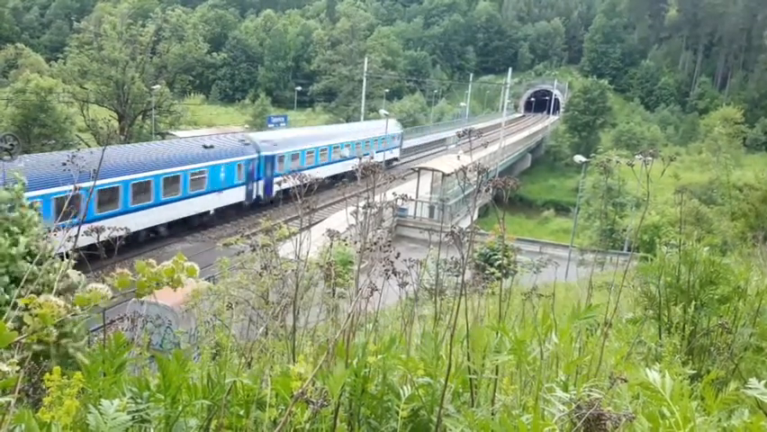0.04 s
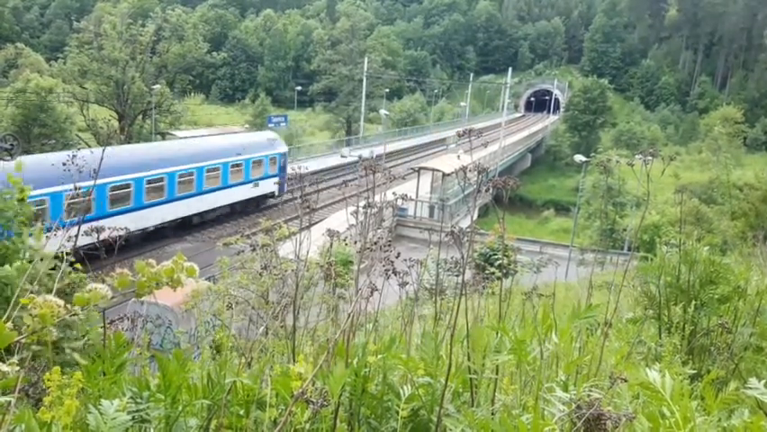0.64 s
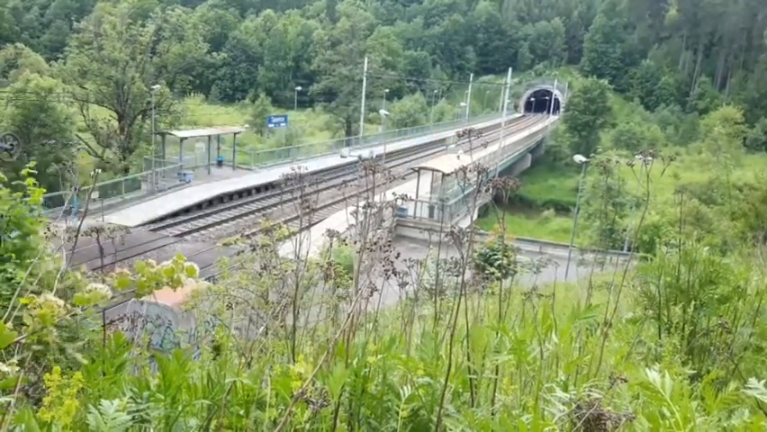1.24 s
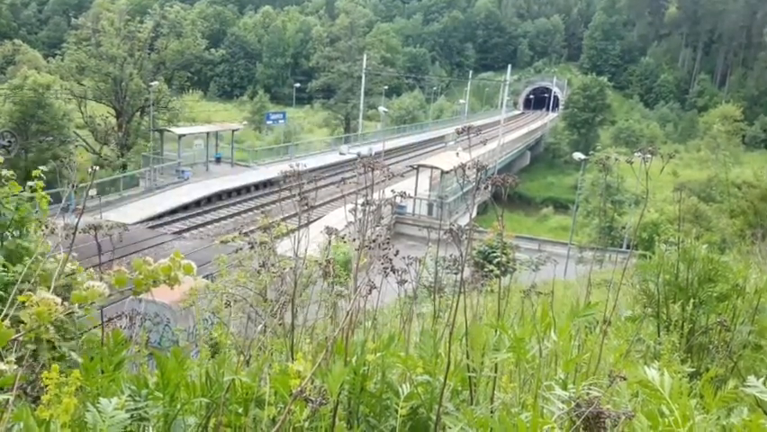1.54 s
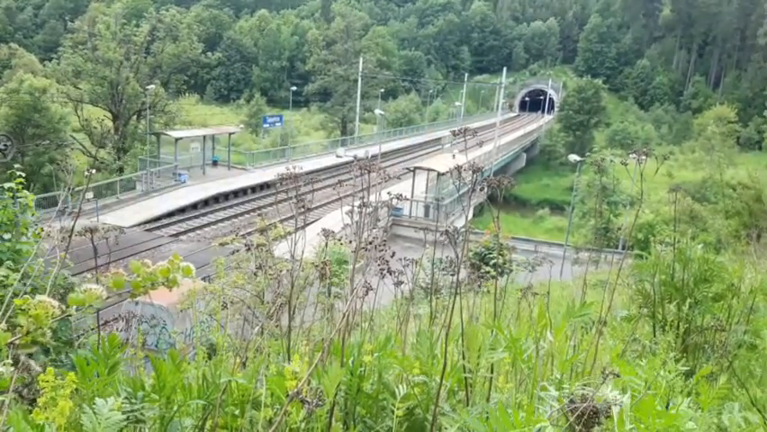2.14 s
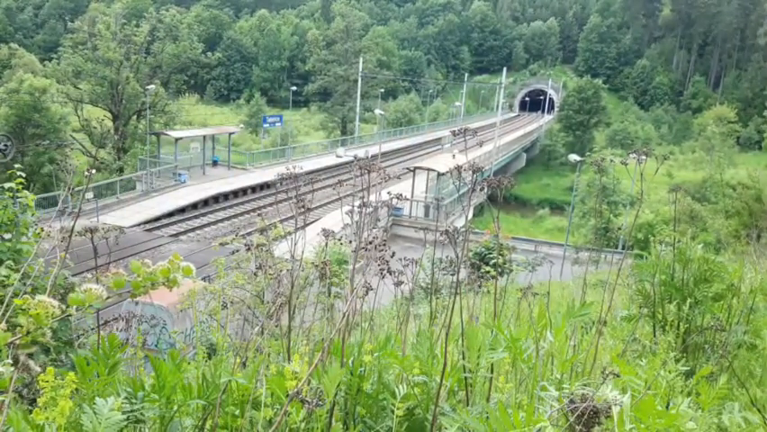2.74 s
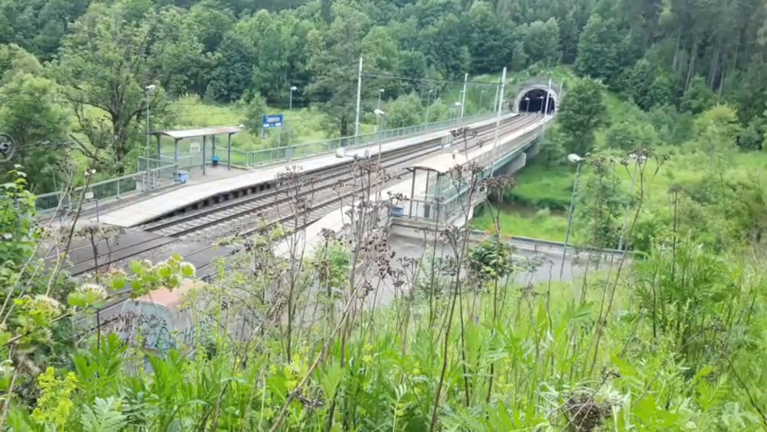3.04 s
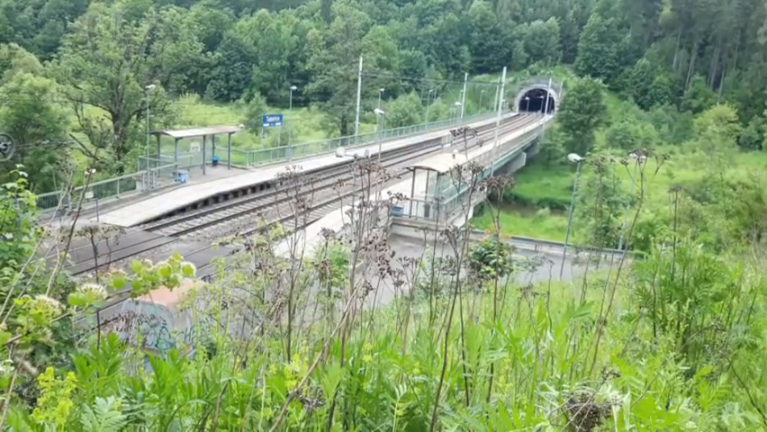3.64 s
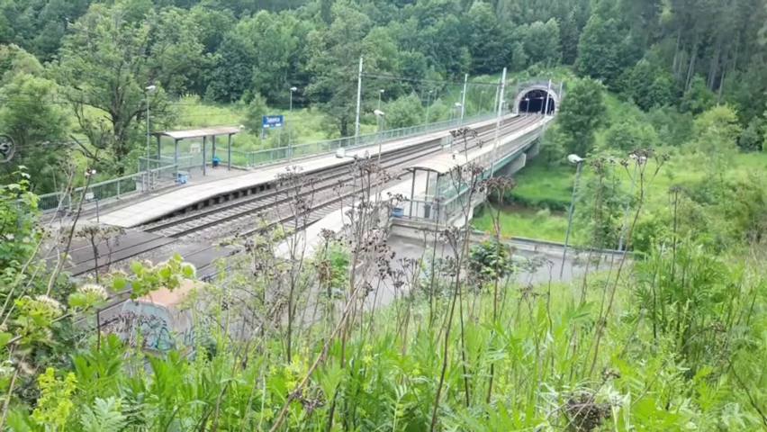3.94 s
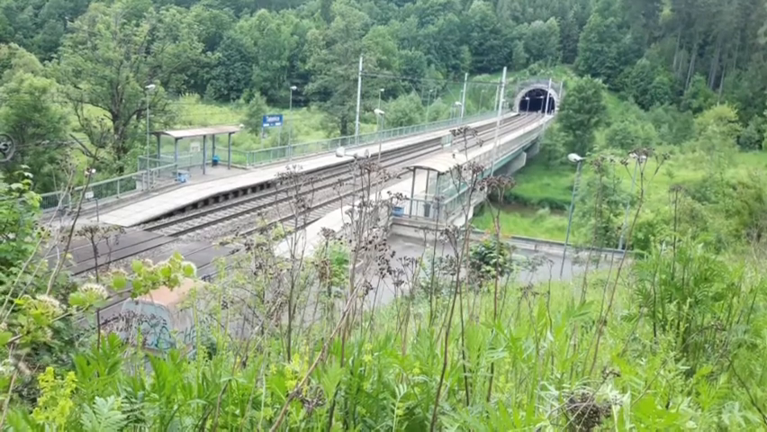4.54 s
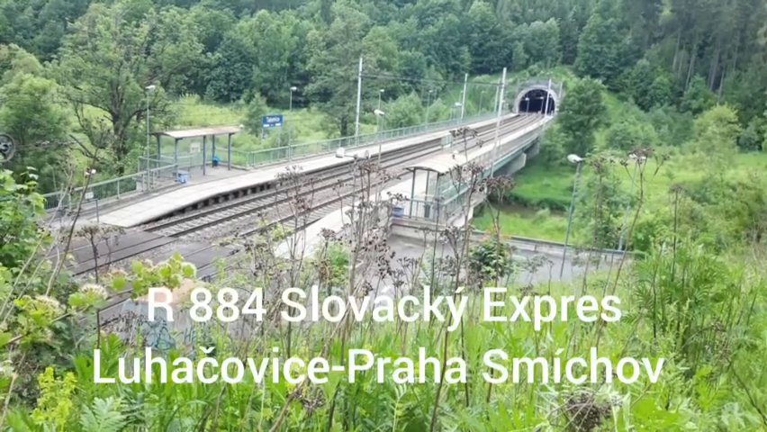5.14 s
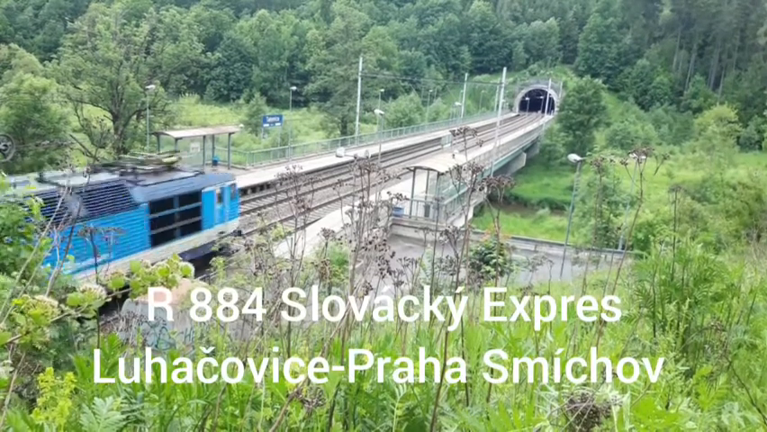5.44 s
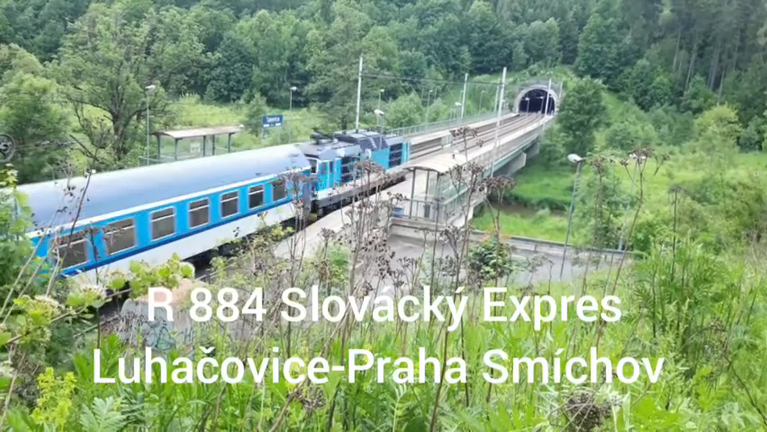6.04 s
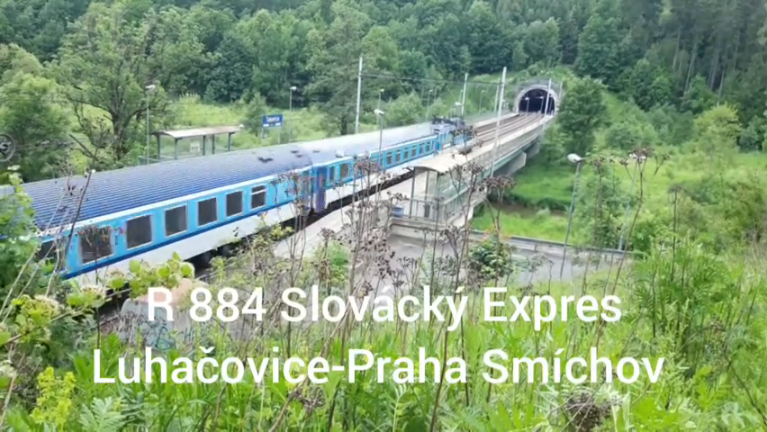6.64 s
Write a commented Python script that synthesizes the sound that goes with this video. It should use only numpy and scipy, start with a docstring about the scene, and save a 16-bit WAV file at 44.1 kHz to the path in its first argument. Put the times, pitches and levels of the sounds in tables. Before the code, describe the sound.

Ringing train wheels recede and stop suddenly, then another electric train drones closer, gives a short hoarse toot and rumbles by.

```python
"""A grassy slope above a valley line, where two electric passenger trains pass.
The last coaches of one roll away until the sound cuts off. After a brief silence birds chip, grass
rustles and a second train drones closer with a hoarse toot. Rough wheels excite rumble, rail roar and
hiss, and ring in their modes bogie by bogie. Levels fall with distance, and the Doppler effect lowers
the locomotive's gear whine as it goes by."""
import sys
import numpy as np
from scipy import signal
from scipy.fft import rfft, irfft, next_fast_len
from scipy.io import wavfile
from scipy.ndimage import uniform_filter1d

SR = 44100
rng = np.random.default_rng(int(sys.argv[2]) if len(sys.argv) > 2 else 0)


def generate_wav(sig):
    """Save sig (samples, or channels by samples) to the path in sys.argv[1] as 16-bit PCM at SR."""
    pcm = np.round(np.clip(np.atleast_2d(sig).T, -1, 1) * 32767).astype(np.int16)
    wavfile.write(sys.argv[1], SR, pcm)


N = 302967
T = np.arange(N) / SR
FFT_SIZE = next_fast_len(N, real=True)
FREQS = np.maximum(np.fft.rfftfreq(FFT_SIZE, 1 / SR), 1)
TRAIN_M_S, SOUND_M_S, TRACK_DISTANCE_M = 32, 343, 15
CUT_S, RESUME_S = 1.529, 1.6  # the silence between the trains
DRIVE_ABREAST_S = 5.16  # closest approach of the locomotive's front drive

# spectrum of track and car bodies nearby: frequency_hz, level_db
RUMBLE_NEAR = [(20, -25), (46, -18), (60, 1), (90, -2), (122, 1.5), (190, -2.5), (270, -4), (340, -11.5),
               (430, -21.5), (700, -22)]
# spectrum of the rails under coaches: frequency_hz, level_db
ROAR_COACH = [(440, -13), (600, 5), (800, 5.5), (1000, 3.5), (1250, 0), (1650, 7.5), (2000, 3.5), (2600, 4),
              (3400, -5), (6000, -34)]
# spectra of the wheel contact, near and far: frequency_hz, level_db
HISS_NEAR = [(1500, -27), (3000, 1.5), (3800, -1.5), (5000, -0.5), (6500, -3), (7900, -6.5), (8800, -4.5),
             (9400, -10), (10100, -20.5), (11600, -21.5), (13000, -26.5), (15600, -34)]
HISS_FAR = [(1500, -24), (3000, -10), (3800, 2.5), (5200, 1), (6600, -0.5), (7900, -6), (9000, -5.5),
            (9600, -10), (10100, -22), (12000, -23.5), (13300, -38), (15600, -47)]


def undb(db):
    """Decibels to amplitude ratio."""
    return 10 ** (np.asarray(db) / 20)


def unit(x):
    """Normalise to rms 1."""
    return x / np.sqrt(np.mean(x ** 2))


def colour(points):
    """Spectral envelope through (frequency_hz, level_db) points, rolling off beyond the ends."""
    hz, db = np.transpose(points)
    rolloff = np.minimum(FREQS / hz[0], 1) * np.minimum(hz[-1] / FREQS, 1)
    return undb(np.interp(np.log(FREQS), np.log(hz), db)) * rolloff ** 2


def resonances(modes):
    """Modal superposition: each mode adds a Lorentzian peak to the gain curve."""
    return sum(undb(db) / (1 + (2 * (FREQS - hz) / width_hz) ** 2) for hz, width_hz, db in modes)


def shaped(x, gain):
    """Filter by a gain curve, to rms 1."""
    return unit(irfft(rfft(x, FFT_SIZE) * gain, FFT_SIZE)[:N])


def walk(rate_hz):
    """Smooth random fluctuation of rms 1, with a bandwidth of about rate_hz."""
    return shaped(rng.standard_normal(N), np.exp(-(FREQS / rate_hz) ** 2) * (FREQS > 1))


def swell(peak_s, half_s):
    """Gaussian envelope of height 1."""
    return np.exp(-.5 * ((T - peak_s) / half_s) ** 2)


def tone(hz, width_hz, rough):
    """Random modulation spreads part of a spectral line into a narrow band."""
    scatter = (walk(width_hz) + 1j * walk(width_hz)) / np.sqrt(2)
    carrier = np.exp(2j * np.pi * np.cumsum(hz) / SR)
    return unit(np.real((1 + rough * scatter) * carrier))


def repitch(x, ratio):
    """Time compression multiplies every frequency by the ratio."""
    return np.interp(np.cumsum(ratio * np.ones(N)) % N, np.arange(N), x)


def doppler_ratio(abreast_s):
    """Doppler effect: a point on a train sounds high as it comes, low as it goes."""
    along_m = TRAIN_M_S * (T - abreast_s)
    receding_m_s = TRAIN_M_S * along_m / np.hypot(along_m, TRACK_DISTANCE_M)
    return 1 / (1 + receding_m_s / SOUND_M_S)


def doublings(abreast_s):
    """Doublings of the distance to a point on a train, counted from its closest approach."""
    distance_m = np.hypot(TRAIN_M_S * (T - abreast_s), TRACK_DISTANCE_M)
    return np.log2(distance_m / TRACK_DISTANCE_M)


def fading(layers, away):
    """Attenuation with distance: each layer loses its own number of dB per doubling."""
    return [db - fall_db * away for db, fall_db in layers]


def contact(grit_db):
    """Contact force between rough surfaces: dense tiny impacts of uneven size."""
    return rng.standard_normal(N) * undb(grit_db * walk(250))


def rolling(levels_db, rumble_points, roar_points, hiss_points, pitch=1):
    """Roughness excitation: wheels shake track and car bodies, make rails roar and hiss at the contact."""
    rumble_db, roar_db, hiss_db = levels_db
    flutter = walk(18)  # worn spots on the turning wheels
    rumble = shaped(contact(grit_db=-1.0), colour(rumble_points)) * undb(rumble_db)
    roar = shaped(contact(grit_db=1.04), colour(roar_points))
    roar = repitch(roar, pitch) * undb(roar_db + 0.69 * flutter)
    hiss = shaped(contact(grit_db=0.63), colour(hiss_points)) * undb(hiss_db + 0.77 * flutter)
    return rumble + roar + hiss


def first_train(tail_abreast_s=0.77):
    """A receding source: the rolling noise holds until the tail has passed, then falls with distance."""
    # rumble, roar and hiss of the last coaches: abreast_db, fall_db_per_doubling
    leaving = [(-28.5, 6.5), (-22, 6), (-27, 14)]
    away = doublings(tail_abreast_s) * (T > tail_abreast_s)
    return rolling(fading(leaving, away), RUMBLE_NEAR, ROAR_COACH, HISS_NEAR) + wheels(0, CUT_S)


def bogie(abreast_s, ring_db, rail_db, hiss_db, half_s, glide=.008, throb_db=3.0, wear=.02):
    """Forced vibration: wheels and rail ring in their modes and treads hiss, swelling as they go by."""
    # modes of the wheel discs and of the rail: frequency_hz, width_hz, level_db
    wheel_modes = [(1670, 110, -2), (2305, 170, -1.5), (2850, 120, -4.5), (3400, 120, -5.5),
                   (4100, 110, -11), (4900, 180, -12), (5980, 60, -11)]
    rail_modes = [(790, 220, 2), (1030, 230, -7), (1600, 610, -5.5)]
    ring = shaped(rng.standard_normal(N), resonances(wheel_modes))
    rail = shaped(rng.standard_normal(N), resonances(rail_modes))
    hiss = shaped(rng.standard_normal(N), colour(HISS_NEAR))
    along = (T - abreast_s) / half_s
    nearness = 1 / (1 + along ** 2)
    tuning = 1 + wear * rng.uniform(-1, 1)  # wheels are worn to their own pitch
    ring = repitch(ring, tuning * (1 - glide * along * np.sqrt(nearness)))
    ring *= undb(ring_db + throb_db * walk(24))
    return nearness * (ring + rail * undb(rail_db) + hiss * undb(hiss_db))


def squeak(peak_s, hz, half_s, db, sink=0.0037):
    """Lateral slip excites one wheel mode briefly; its pitch falls slightly as the wheel moves off."""
    sinking_hz = hz * (1 - sink * np.tanh((T - peak_s) / half_s))
    return undb(db) * swell(peak_s, half_s) * tone(sinking_hz, width_hz=60, rough=1.7)


def wheels(start_s, end_s):
    """Superposition of the bogies and squeaks that peak between two moments."""
    # bogies rolling past: abreast_s, ring_db, rail_db, hiss_db, half_duration_s
    bogies = [(0.03, -26.5, -37, -28, 0.21), (0.302, -26, -29, -25, 0.2), (0.563, -23.5, -32, -26.5, 0.11),
              (0.791, -26, -38, -28, .1), (0.928, -30, -38, -29, 0.053), (1.237, -24, -30.5, -27.5, .1),
              (1.415, -30, -44, -35, 0.1205), (5.223, -28.5, -26.5, -38, 0.134),
              (5.604, -36, -27, -26, 0.078), (5.885, -42, -27.5, -37, 0.17), (6.184, -35, -37, -25, 0.103),
              (6.57, -22, -23, -28, 0.087), (6.718, -20, -19.5, -24, 0.082)]
    # single wheel modes flaring up: peak_s, pitch_hz, half_duration_s, level_db
    squeaks = [(0.316, 2520, 0.12, -27.5), (0.555, 1665, 0.033, -25.5), (0.754, 2300, .05, -31),
               (.78, 1703, 0.023, -25.5), (.802, 2840, .025, -31), (0.997, 5100, 0.052, -36),
               (1.059, 895, 0.013, -26), (1.185, 3200, 0.0088, -28), (1.215, 2378, 0.072, -28),
               (1.37, 4750, .07, -35), (6.185, 2260, .06, -26.5), (6.184, 3350, 0.048, -26.5),
               (6.64, 3137, 0.12, -25.5), (6.68, 2353, 0.053, -24), (6.7, 1700, 0.094, -24)]
    ringing = sum(bogie(*row) for row in bogies if start_s < row[0] < end_s)
    return ringing + sum(squeak(*row) for row in squeaks if start_s < row[0] < end_s)


def hill_shadow(clear_s=2.34):
    """Acoustic shadow: how much of the second train the hillside still hides, from 1 to 0."""
    return np.clip((clear_s - T) / (clear_s - RESUME_S), 0, 1)


def second_train(loco_abreast_s=5.366, coach_abreast_s=6.13, arrive_s=4.66, arrive_span_s=0.43):
    """An approaching source: a drone leaves the hill's shadow and opens into a near, rolling roar."""
    # rumble, roar and hiss of each part of the train: abreast_db, fall_db_per_doubling
    far_levels = [(-27.5, 4.12), (-24, 7.49), (-29, 8.76)]
    loco_levels = [(-19.5, 16.3), (-18, 9.8), (-28, 12.6)]
    coach_levels = [(-25, 4.7), (-23, 11), (-24.5, 9.8)]
    # spectra of far track and bodies, far rails and rails under the locomotive: frequency_hz, level_db
    rumble_far = [(20, -33), (45, -19), (68, -5.5), (92, -19), (130, -3), (180, 1.5), (230, -4),
                  (290, -18.5), (360, -22), (600, -44)]
    roar_far = [(300, -15), (430, -2.5), (520, 0.5), (760, 8), (950, 1), (1250, 1.5), (1700, 3),
                (2300, -1.5), (3300, -4.5), (6000, -26)]
    roar_loco = [(350, -14), (510, 0), (700, 7), (800, 12), (930, -4.5), (1100, 5), (1280, 2), (1560, 10.5),
                 (1900, -1.5), (2200, 1.5), (3200, -11), (6000, -32)]
    # gain in the hill's full shadow: rumble_db, roar_db, hiss_db
    shadow_db = (-14.5, -6.5, 0)
    loco_away = doublings(loco_abreast_s)
    coach_away = doublings(coach_abreast_s) * (T < coach_abreast_s)
    far_db = fading(far_levels, loco_away) + np.outer(shadow_db, hill_shadow())
    far = rolling(far_db, rumble_far, roar_far, HISS_FAR)
    loco = rolling(fading(loco_levels, loco_away), RUMBLE_NEAR, roar_loco, HISS_NEAR,
                   pitch=1.025 * doppler_ratio(DRIVE_ABREAST_S))
    coaches = rolling(fading(coach_levels, coach_away), RUMBLE_NEAR, ROAR_COACH, HISS_NEAR)
    near = .5 + .5 * np.tanh((T - arrive_s) / arrive_span_s)  # drives an equal-power crossfade
    return np.sqrt(1 - near) * far + np.sqrt(near) * (loco + coaches) + wheels(RESUME_S, T[-1])


def drive_whine(source_hz=760, abreast_db=-26, fall_db_per_doubling=10, rear_lag_s=0.55,
                rear_db=-8, skirt_db=-7, shadow_db=-5, waver=0.0018):
    """Doppler shift lowers the passing locomotive's gear whine; the rear bogie follows a moment later."""
    # brief surges of the whine: peak_s, half_duration_s, lift_db
    flares = [(3.04, 0.049, 11), (3.5, 0.24, 3.5), (4.44, 0.029, 10), (4.618, .04, 0), (5.283, 0.042, 10),
              (5.444, .035, 10), (5.752, 0.03, 7), (5.92, .04, 5)]
    front_hz = source_hz * doppler_ratio(DRIVE_ABREAST_S) * (1 + waver * walk(3.5))
    away = doublings(DRIVE_ABREAST_S + rear_lag_s / 2)
    db = abreast_db - fall_db_per_doubling * away + shadow_db * hill_shadow()
    flare = undb(sum(lift_db * swell(peak_s, half_s) for peak_s, half_s, lift_db in flares))
    front = tone(front_hz, width_hz=18, rough=1.0)
    rear = tone(source_hz * doppler_ratio(DRIVE_ABREAST_S + rear_lag_s), width_hz=23, rough=4.4)
    skirt = tone(front_hz, width_hz=60, rough=21.0)  # scattering along the slope widens the line
    return undb(db) * (flare * front + undb(rear_db) * rear + undb(skirt_db) * np.sqrt(flare) * skirt)


def valley(db=-52, drift_db=1.6):
    """Ambient noise: trees and distant traffic merge into a soft, slowly swelling hush."""
    # spectrum of the hush: frequency_hz, level_db
    hush = [(20, -15), (50, -2), (70, 12), (95, -7), (180, 7), (340, -14), (510, 6), (800, -13), (1250, 0),
            (2200, -23), (5000, -19), (9000, -34), (10500, -28), (15600, -43)]
    return shaped(rng.standard_normal(N), colour(hush)) * undb(db + drift_db * walk(1.2))


def high_sizzle(centre_hz=9600, db=-68.5):
    """Narrow-band noise: a faint, thin, steady sizzle near 9.6 kHz."""
    return undb(db) * tone(np.full(N, centre_hz), width_hz=130, rough=5)


def grass():
    """Friction noise: dry stalks brush each other in short, crisp swells."""
    # grass stirring close by: peak_s, half_duration_s, level_db
    rustles = [(1.66, 0.11, -56.5), (1.912, 0.044, -55), (2.177, 0.033, -52), (2.3, .08, -55.5)]
    # spectrum of the rubbing stalks: frequency_hz, level_db
    stalk_spectrum = [(4000, -16), (7000, -1), (9200, 3), (10200, -9), (12500, -8), (15600, -15)]
    stir = sum(undb(db) * swell(peak_s, half_s) for peak_s, half_s, db in rustles)
    return stir * shaped(contact(grit_db=-1.5), colour(stalk_spectrum))


def birds(attack_s=.004, fall_s=.007, sag_hz_per_s=4500):
    """Frequency modulation: each chip drops quickly to a knee, then sags on as a fading whistle."""
    # bird chips: start_s, start_hz, knee_hz, length_s, level_db
    chips = [(1.688, 6200, 4350, .075, -53), (1.798, 5700, 4900, .025, -53), (1.999, 6200, 4850, .08, -50),
             (2.612, 5800, 4400, .06, -54)]
    out = np.zeros(N)
    for start_s, start_hz, knee_hz, length_s, db in chips:
        age = np.clip(T - start_s, 0, length_s)
        hz = knee_hz + (start_hz - knee_hz) * np.exp(-age / fall_s) - sag_hz_per_s * age
        envelope = np.minimum(age / attack_s, 1) * np.sqrt(1 - age / length_s)
        out += undb(db) * envelope * np.sin(2 * np.pi * np.cumsum(hz) / SR)
    return out


def toot(start_s=4.265, attack_s=.035, hold_s=.105, release_s=.07,
         ring_db=-29, air_db=-35.5, sag_per_s=.25):
    """Resonance: rushing air excites a few modes that sag in pitch, giving a short, hoarse blast."""
    # resonances of the toot: frequency_hz, width_hz, level_db
    modes = [(704, 63, 1), (2090, 150, -4), (2820, 120, -11), (3550, 90, -15), (5230, 450, -12.5)]
    age = T - start_s
    attack = np.clip(age / attack_s, 0, 1)
    release = np.exp(-np.maximum(age - attack_s - hold_s, 0) / release_s)
    pitch = 1 - sag_per_s * np.clip(age - hold_s, -hold_s, hold_s)
    ring = repitch(shaped(rng.standard_normal(N), resonances(modes)), pitch)
    air = shaped(rng.standard_normal(N), colour(HISS_FAR))
    return attack * release * (undb(ring_db) * ring + undb(air_db) * air)


def scene():
    """One train, an abrupt silence, then the next, superposed on the quiet background."""
    later = second_train() + drive_whine() + toot() + birds() + high_sizzle() + grass() + valley()
    before_cut = uniform_filter1d(1. * (T < CUT_S), size=64)
    after_cut = uniform_filter1d(1. * (T > RESUME_S), size=64)
    return (before_cut * first_train() + after_cut * later)[None]


def record(dry):
    """Band limiting: a steep low-pass filter removes the highest treble."""
    cutoff_hz = 15700
    return signal.sosfilt(signal.ellip(10, .1, 80, cutoff_hz, fs=SR, output="sos"), dry)


dry = scene()
out = record(dry)
generate_wav(out)
```